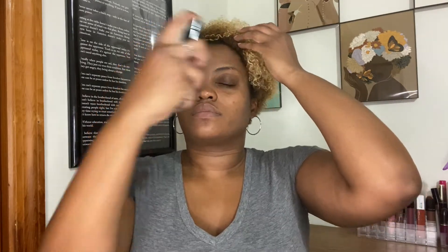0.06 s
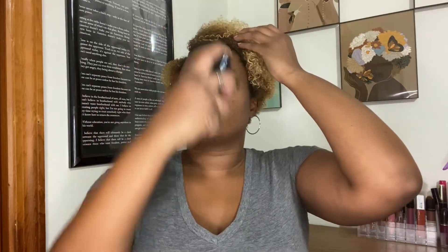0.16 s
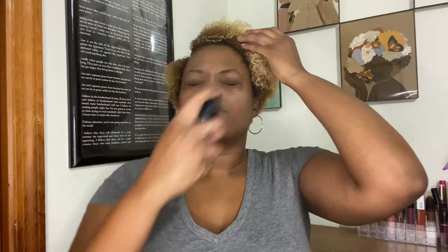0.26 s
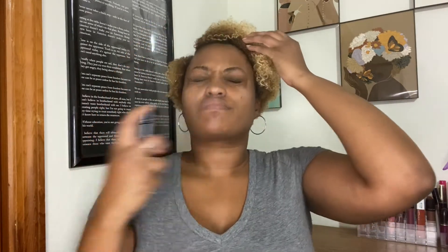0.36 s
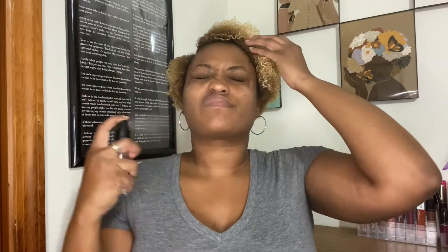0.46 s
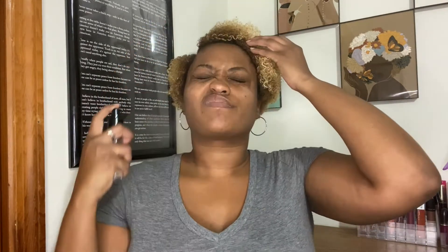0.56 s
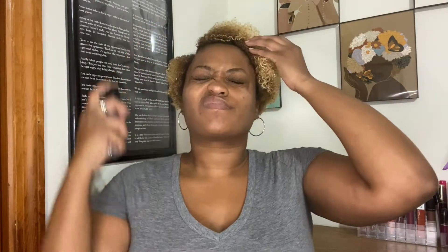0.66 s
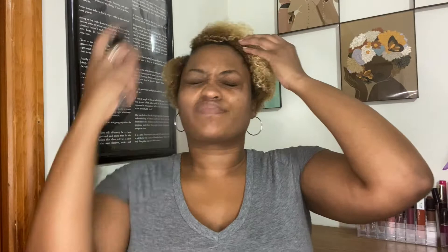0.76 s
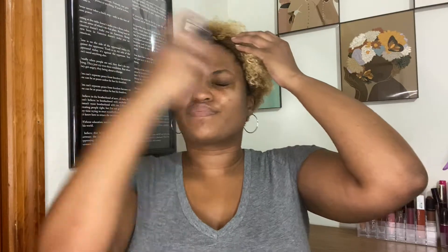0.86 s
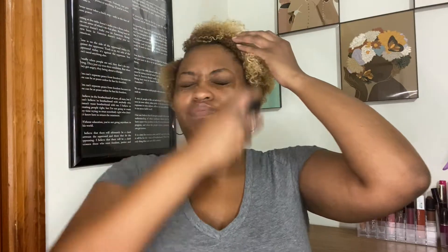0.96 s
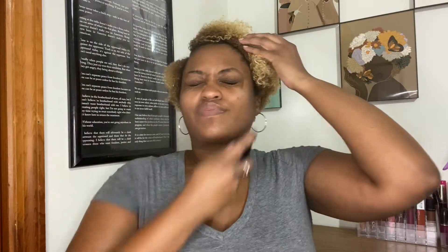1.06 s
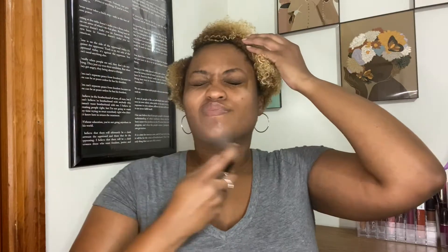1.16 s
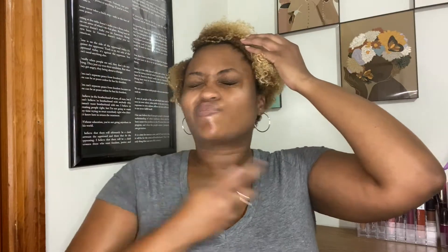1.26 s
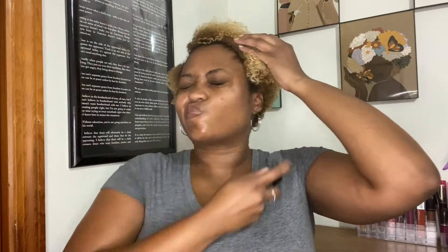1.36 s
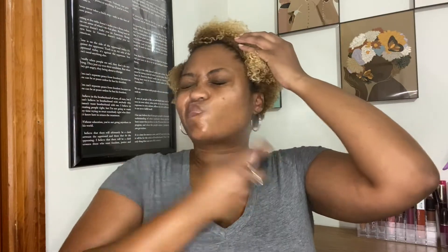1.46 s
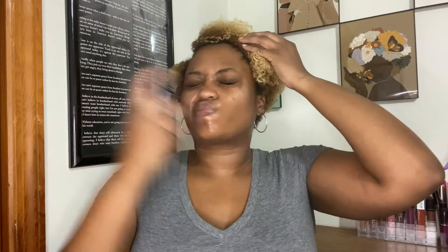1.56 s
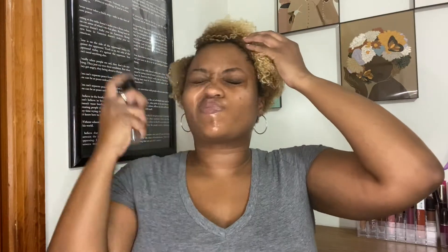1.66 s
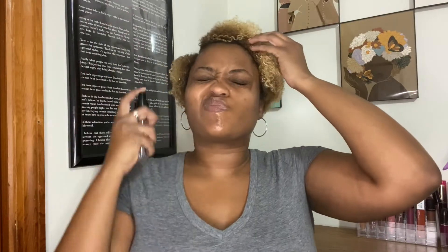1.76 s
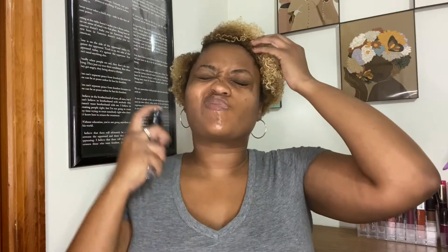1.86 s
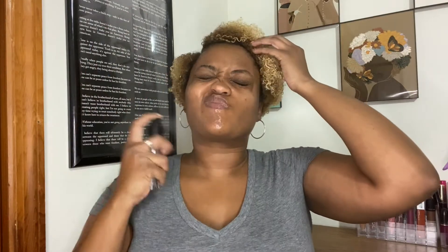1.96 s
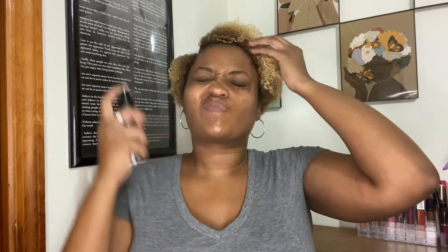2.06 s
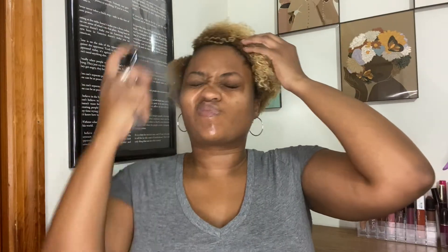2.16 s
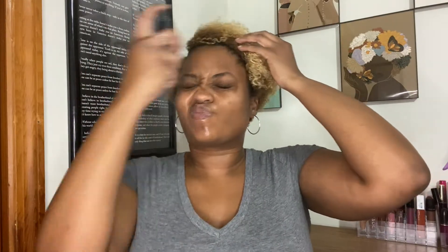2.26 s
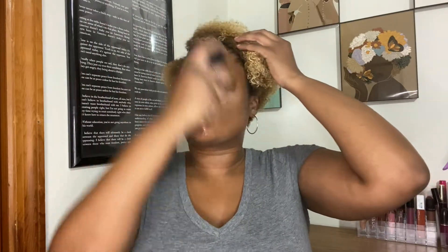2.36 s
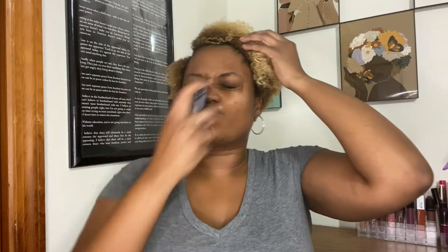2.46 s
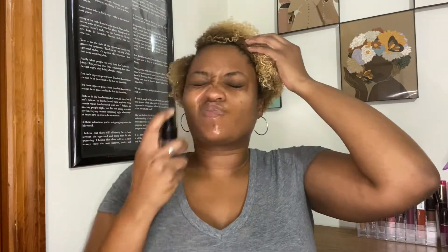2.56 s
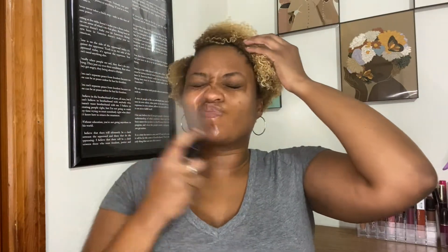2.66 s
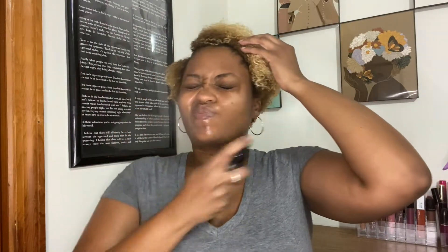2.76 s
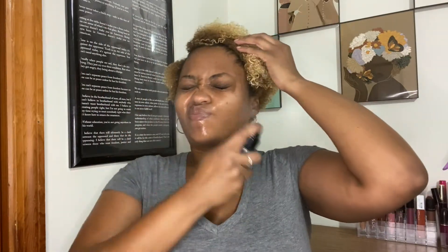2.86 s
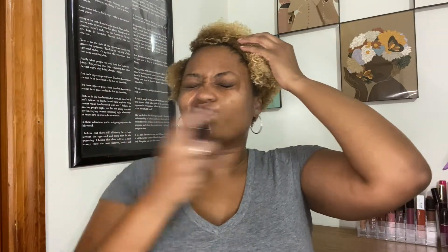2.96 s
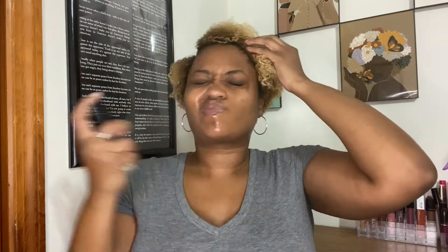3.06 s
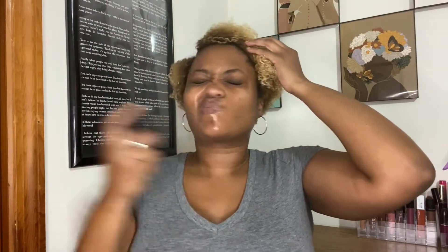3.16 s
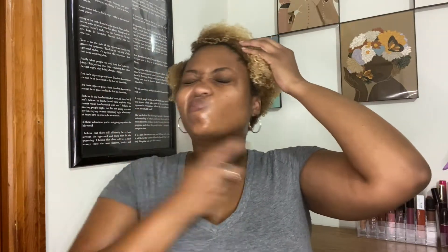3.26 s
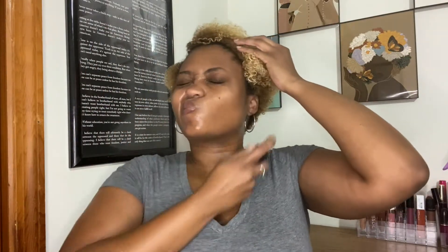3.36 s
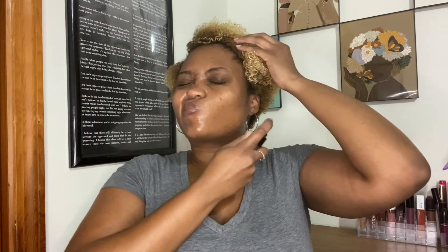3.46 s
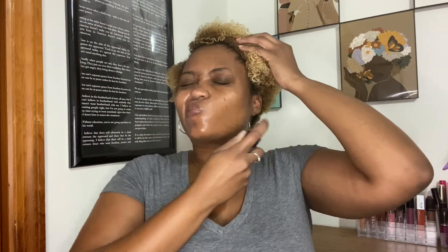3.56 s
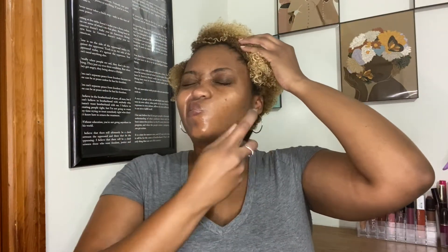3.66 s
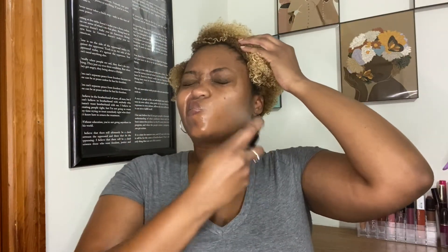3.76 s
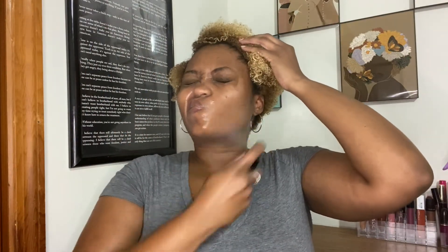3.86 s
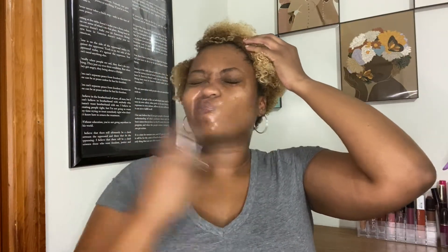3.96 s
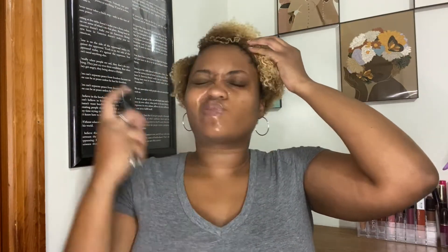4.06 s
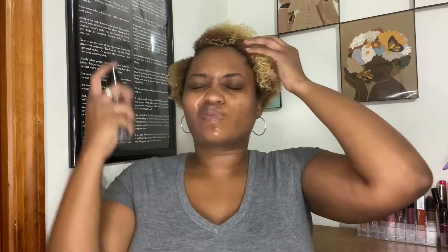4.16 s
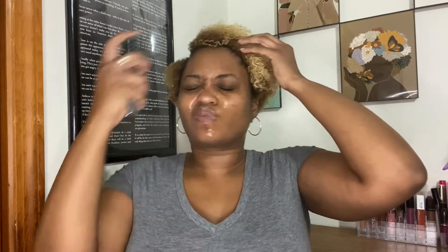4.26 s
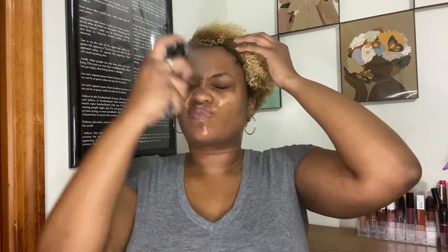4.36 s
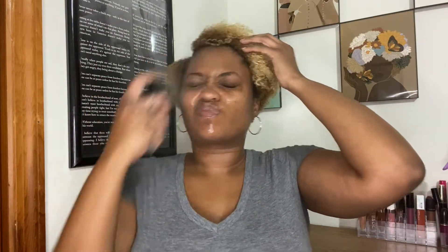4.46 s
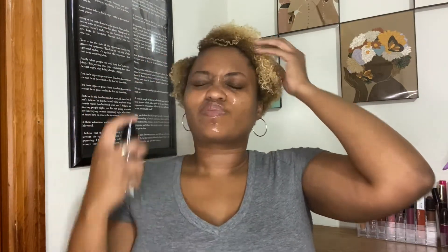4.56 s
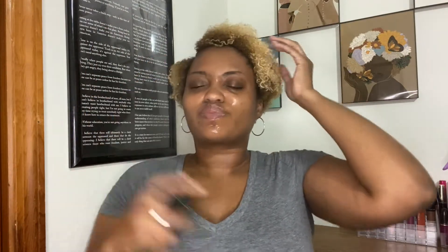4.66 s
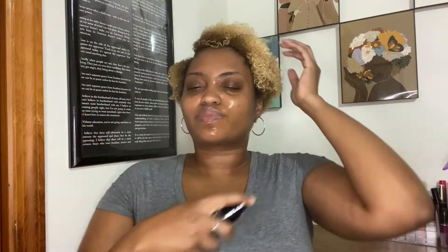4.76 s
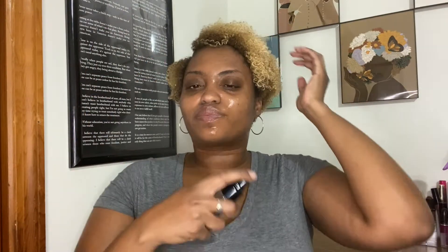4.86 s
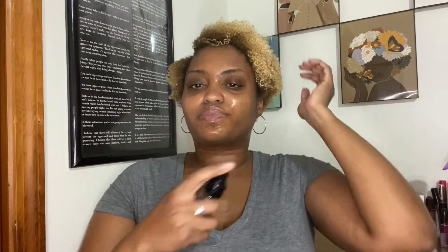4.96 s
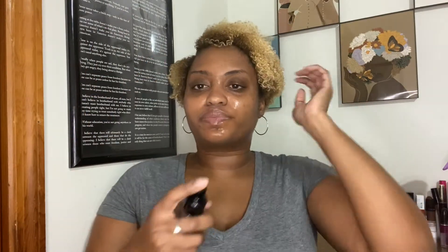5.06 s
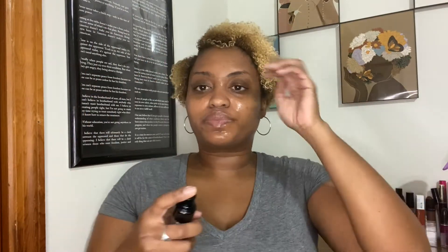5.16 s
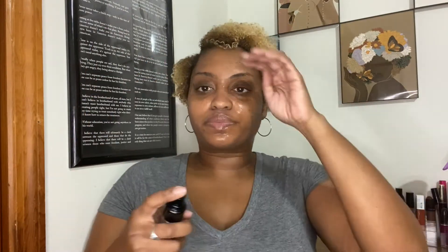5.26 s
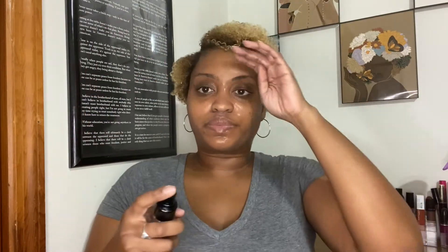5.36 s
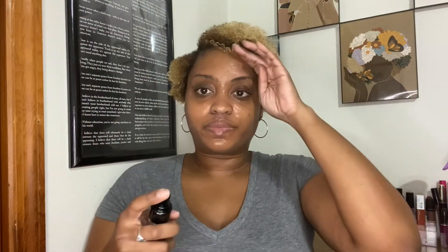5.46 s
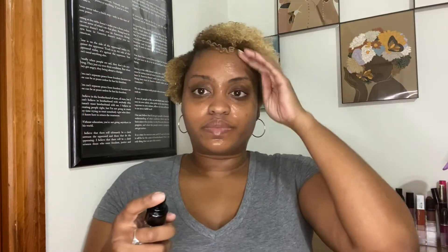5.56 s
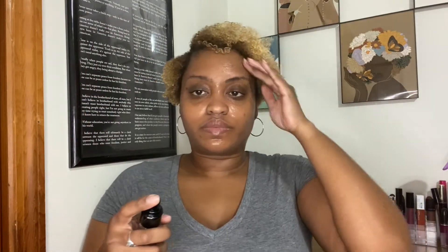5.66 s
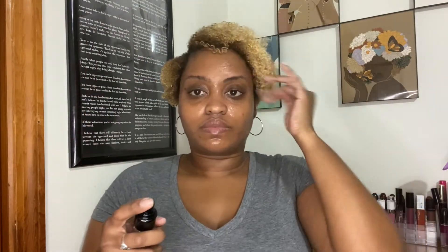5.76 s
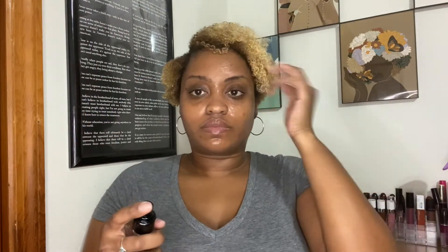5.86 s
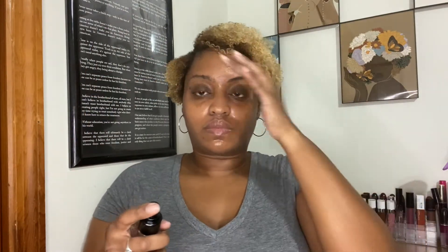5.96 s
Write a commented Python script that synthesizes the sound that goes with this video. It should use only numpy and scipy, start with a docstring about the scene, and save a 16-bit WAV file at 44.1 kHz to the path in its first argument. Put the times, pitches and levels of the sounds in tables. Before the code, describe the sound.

Short, fine spray hisses come in quick succession, mixed with hard clicky pump chatter, then fade into faint low room rumble.

```python
"""A small pump bottle mists a face ten times in a quiet room, swung about between the strokes.
Each stroke is shaped noise, a hiss that follows the push; the valve, plunger and grip click around it.
Six times the pump's spring chatters hard in the same run of five knocks: noise bursts and decaying sines.
Swells of noise are liquid and sleeve; rumble, a faint hum and two soft bumps lie underneath.
A close pair of microphone ports picks it all up."""
import sys
import numpy as np
from scipy import signal
from scipy.fft import rfft, irfft
from scipy.io import wavfile

SR = 44100
rng = np.random.default_rng(int(sys.argv[2]) if len(sys.argv) > 2 else 0)


def materialize(psi):
    """Save the field psi as 16-bit PCM at rate SR to the path in sys.argv[1].

    A 1-D psi becomes a single channel; in a 2-D psi each row is a channel.
    """
    bounded = np.clip(np.atleast_2d(psi).T, -1, 1)
    quanta = np.round(bounded * 32767).astype(np.int16)
    wavfile.write(sys.argv[1], SR, quanta)


N = 264996
TIME = np.arange(N) / SR


def from_db(db):
    """Decibels to gain."""
    return 10 ** (np.asarray(db) / 20)


def rms_one(x):
    """Scale to unit power."""
    return x / np.sqrt(np.mean(x ** 2) + 1e-20)


def at_hz(points, hz):
    """Read a table on a log-frequency axis."""
    f, value = np.transpose(points)
    return np.interp(np.log(hz + 1e-3), np.log(f), value)


def noise(spectrum):
    """Two unrelated noises of one colour, rms 1 over the pair."""
    colour = from_db(at_hz(spectrum, np.fft.rfftfreq(N, 1 / SR)))
    white = rng.standard_normal((2, N))
    return rms_one(irfft(rfft(white) * colour, N))


def drift(rate):
    """Slow random wander, rms 1, through `rate` random points per second."""
    return rms_one(np.interp(TIME * rate, np.arange(N), rng.standard_normal(N)))


def lowpass(x, hz):
    """Keep the part below hz without shifting its phase."""
    return signal.sosfiltfilt(signal.butter(2, hz, fs=SR, output="sos"), x)


def swell(middle, half_length):
    """A smooth rise and fall of height 1."""
    return np.exp(-np.minimum(((TIME - middle) / half_length) ** 2, 20))


# Colour of the room's background. Each row: frequency in Hz, relative density in dB per Hz.
RUMBLE_COLOUR = [(20, -24), (35, -13.5), (58, 1.5), (85, -5), (110, -11.5), (150, -16.5), (250, -25),
                 (500, -35), (1000, -40), (3000, -49.5), (8000, -53.5), (15000, -56.5)]


def rumble(level_db, waver_db):
    """The room's low background, its bass rising and sinking in irregular lumps."""
    floor = noise(RUMBLE_COLOUR)
    bass = lowpass(floor, 350)
    return from_db(level_db) * (floor - bass + bass * from_db(waver_db * drift(10)))


# Steady hum tones. Each row: frequency in Hz, level in dB before the lean to the right.
HUM_TONES = [(59, -61.5), (107, -65.5)]
# Soft hollow bumps. Each row: middle in seconds, half length in seconds, pitch in Hz,
# level in dB before the lean to the right.
SOFT_BUMPS = [(1.588, .04, 163.7, -50), (1.832, 0.014, 175, -45)]


def low_tones(waver, lean_db):
    """Hum sines whose phase wavers by some radians, and two swelling sine bumps, stronger on the right."""
    wander = [waver * drift(10) for _ in HUM_TONES]
    hum = sum(from_db(db) * np.sin(2 * np.pi * hz * TIME + phase)
              for (hz, db), phase in zip(HUM_TONES, wander))
    bumps = sum(from_db(db) * swell(s, half) * np.sin(2 * np.pi * hz * TIME)
                for s, half, hz, db in SOFT_BUMPS)
    return (hum + bumps) * from_db([[-lean_db], [lean_db]])


# Pump strokes. Each row: valve opening in seconds, hold in seconds, peak in dB, opening flow in dB re peak,
# lower hiss in dB re the peak as the aim changes, click of the valve in dB; levels before trims.
PUMP_STROKES = [(0.099, 0.18, -45.5, -9, 2.5, -54), (0.396, 0.11, -47.5, 0.5, 3.5, -44.5),
                (0.626, 0.1, -42, -7, -0.5, -60), (1.106, 0.12, -43, -5, 1, -44.5),
                (1.333, 0.14, -43.5, -7, 1.5, -36.5), (1.852, 0.12, -43, -3, 0.5, -50.5),
                (2.051, 0.15, -42.5, -6, -2, -37.5), (2.571, 0.14, -43.5, -2, -1.5, -41.5),
                (3.743, .19, -42.5, -5.5, -0.5, -55.5), (4.278, 0.19, -42, -4.5, -2, -60)]
# Colour of the nozzle hiss. Each row: frequency in Hz, relative density in dB per Hz.
MIST_COLOUR = [(200, -40), (500, -27), (1000, -11.5), (2000, -5.5), (3000, -2.5), (4300, 0), (6500, 2),
               (9000, 2), (11500, -1), (13300, 5), (15600, -14)]
PUSH_SHARE, EASED_DB = 0.66, -5   # share of the hold where the finger pushes hardest; flow when it eases


def mist(open_s, close_s, split_hz, low_share, sputter_db, flutter_db):
    """The nozzle jet: a harder push lifts the fine hiss more than its lower part; droplets make it sputter."""
    jet = noise(MIST_COLOUR)
    low = lowpass(jet, split_hz)
    low_gain, high_gain = np.zeros(N), np.zeros(N)
    for opens, held, peak_db, opening_db, lower_db, _ in PUMP_STROKES:
        hardest, eases = opens + PUSH_SHARE * held, opens + held
        opening = np.clip((TIME - opens) / open_s, 0, 1)
        closing = np.exp(-np.minimum(np.maximum(TIME - eases, 0) / close_s, 20))
        valve = opening * closing
        push_db = np.interp(TIME, [opens, hardest, eases], [opening_db, 0, EASED_DB])
        high_gain += valve * from_db(peak_db + push_db)
        low_gain += valve * from_db(peak_db + lower_db + low_share * push_db)
    lower_hiss = low * low_gain * from_db(flutter_db * drift(40))
    fine_hiss = (jet - low) * high_gain
    return (lower_hiss + fine_hiss) * from_db(sputter_db * drift(600))


def off_face(x, gain, lag_s, sway):
    """The face throws the hiss back after a short, changing delay, so that its colour shifts."""
    lag = lag_s * np.exp(sway * drift(5))
    echo = np.array([np.interp(TIME - lag, TIME, side) for side in x])
    return (x + gain * echo) / np.sqrt(1 + gain ** 2)


# Light clicks of the plunger and grip. Each row: start in seconds, crack in dB, body in dB,
# ring in Hz; levels before trims.
PLUNGER_CLICKS = [(0.3171, -58.5, -50.5, 3300), (0.547, -54, -56, 3240), (0.5993, -58.5, -62, 4200),
                  (0.7842, -67, -58, 2270), (1.001, -61, -53.5, 3060), (1.0151, -45, -45.5, 2810),
                  (1.0235, -38.5, -43, 2600), (1.2826, -38.5, -44.5, 3600), (1.522, -57, -57, 4060),
                  (1.7619, -35.5, -45.5, 3400), (2.034, -56, -57, 3250), (2.0596, -33, -43.5, 2850),
                  (2.2587, -46, -52, 3590), (2.4973, -41.5, -48, 3600), (2.5438, -41.5, -48, 3730),
                  (2.7706, -40, -43.5, 2960), (3.0279, -39, -47.5, 3800), (3.2502, -59, -70, 2050),
                  (3.373, -43.5, -43.5, 4170), (3.3826, -38, -45, 3700), (4.0492, -63, -58, 4250),
                  (4.0658, -65, -58, 3860), (4.5863, -50, -61.5, 2990), (4.6045, -40, -48, 3700)]
VALVE_BODY_DB, VALVE_HZ = -7, 3200   # body of the valve's click re its crack, and its ring
SEAT_S, SEAT_CRACK_DB, TICK_BODY_DB = 0.004, -7, -2   # gap to the seating; its duller crack; tick's body
CLICK_RING_T60_S = 0.014


def plunger_contacts():
    """The valve clicks as each stroke begins, plunger and grip in between; each click ticks, then seats."""
    valve = [(opens, db, db + VALVE_BODY_DB, VALVE_HZ) for opens, *_, db in PUMP_STROKES]
    rows = []
    for s, crack_db, body_db, hz in PLUNGER_CLICKS + valve:
        rows.append((s, crack_db, body_db + TICK_BODY_DB, hz, CLICK_RING_T60_S))
        rows.append((s + SEAT_S, crack_db + SEAT_CRACK_DB, body_db, hz, CLICK_RING_T60_S))
    return rows


# Modes of the bottle's wall. Each row: nominal pitch in Hz, relative level in dB, t60 in seconds.
BOTTLE_MODES = [(840, -16, 0.008), (1270, -18, 0.0074), (1817, -28.5, 0.0078), (1960, -19.5, 0.045),
                (2760, -12, 0.016), (2831, -4.5, 0.032), (3570, -22, .02), (4906, -6, 0.024),
                (6580, -18, 0.073)]
# Colours of the bright crack and the dull knock. Each row: frequency in Hz, relative density in dB per Hz.
CRACK_COLOUR = [(1000, -22.5), (3000, -11), (5000, -3), (6800, 1.5), (8500, 1), (11000, -1), (13000, 1.5),
                (15600, -5)]
KNOCK_COLOUR = [(100, -6.5), (300, -35), (600, -16.5), (1200, -4), (2400, -0.5), (4000, 0.5), (7000, -9.5),
                (15000, -29.5)]


def knocks(contacts, crack_db, knock_db, ring_db, modes_db, crack_s, knock_s, rise_s, grit_db, snap, snap_s):
    """Each contact snaps, cracks and knocks; it rings the wall and a cavity tuned by the liquid."""
    t = TIME[:SR // 10]
    rise = 1 - np.exp(-t / rise_s)
    crack = rise * (np.exp(-(t / crack_s) ** 2) + snap * np.exp(-t / snap_s))
    knock = rise * np.exp(-(t / knock_s) ** 2)
    sharp, dull, rings = np.zeros(N), np.zeros(N), np.zeros((2, N))
    for s, level_db, body_db, ring_hz, ring_s in contacts:
        first = round(s * SR)
        span = slice(first, first + len(t))
        sharp[span] += from_db(level_db + crack_db) * crack
        dull[span] += from_db(body_db + knock_db) * knock
        # the grip detunes the wall a little from blow to blow
        wall = [(hz * rng.normal(1, 0.024), db + modes_db, t60) for hz, db, t60 in BOTTLE_MODES]
        cavity = (ring_hz, ring_db, ring_s)
        for hz, db, t60 in [cavity] + wall:
            phase = rng.uniform(0, 2 * np.pi, (2, 1))   # its own on each side
            decay = from_db(body_db + db - 60 * t / t60)
            rings[:, span] += rise * decay * np.sin(2 * np.pi * hz * t + phase)
    gritty_crack = sharp * noise(CRACK_COLOUR) * from_db(grit_db * drift(4000))
    return gritty_crack + dull * noise(KNOCK_COLOUR) + rings


# Liquid and sleeve as the arms move. Each row: middle in seconds, half length in seconds,
# level in dB before the lumps.
ARM_SWISHES = [(.358, 0.052, -63), (1.544, 0.017, -61.5), (2.496, 0.039, -61), (3.348, 0.037, -65.5),
               (3.65, .09, -84.5), (4.099, 0.032, -76.5), (4.23, 0.067, -76.5), (4.586, 0.055, -64),
               (5.05, 0.14, -86), (5.717, 0.058, -90.5)]
# Colour of the swishes. Each row: frequency in Hz, relative density in dB per Hz.
SWISH_COLOUR = [(200, -16.5), (700, -8.5), (1700, 2.5), (3500, -4), (7000, -11), (15000, -19.5)]


def swishes(lumpy_db):
    """Soft, uneven swells of rubbing or running noise."""
    level = sum(from_db(db) * swell(s, half) for s, half, db in ARM_SWISHES)
    return level * from_db(lumpy_db * drift(80)) * noise(SWISH_COLOUR)


# Chatters of the pump's spring. Each row: start in seconds, length in seconds, crack in dB, body in dB,
# ring at the start in Hz, ring at the end in Hz, ring t60 in seconds; levels and pitches are nominal.
SPRING_CHATTERS = [(.3851, .0225, -32, -34, 3200, 3000, .015),
                   (.8331, .0445, -25.5, -32.5, 2900, 2400, .018),
                   (1.5812, .0512, -26.5, -29.5, 2800, 2200, .018),
                   (2.3041, .0512, -28, -31, 2550, 3300, .016), (2.8135, .051, -26, -29, 3000, 3250, .03),
                   (3.0855, .0515, -26, -29.5, 2700, 2400, .022)]
# The course of every chatter, five hard knocks. Each row: share of its length, level in dB re the run.
CHATTER_COURSE = [(0, -7), (.218, -1.5), (.483, -1.5), (.772, 0), (1, -7.5)]
TOUCH_LEAD_S = 0.0048   # a duller touch comes just ahead of each middle knock
TOUCH_CRACK_DB, TOUCH_BODY_DB = -14.5, -7.5
RING_SCATTER = 0.055   # the liquid shifts the ring by about this share from knock to knock


def spring_contacts():
    """The spring's chatter swells and stops while its ring glides: rows laid out as for knocks()."""
    rows = []
    last = len(CHATTER_COURSE) - 1
    for start, length, crack_db, body_db, first_hz, last_hz, t60 in SPRING_CHATTERS:
        for k, (share, db) in enumerate(CHATTER_COURSE):
            s = start + share * length
            glide_hz = first_hz + share * (last_hz - first_hz)
            hz, touch_hz = glide_hz * rng.normal(1, RING_SCATTER, size=2)
            crack, body = crack_db + db, body_db + db
            rows.append((s, crack, body, hz, t60))
            if 0 < k < last:
                rows.append((s - TOUCH_LEAD_S, crack + TOUCH_CRACK_DB, body + TOUCH_BODY_DB, touch_hz, t60))
    return rows


def with_bounces(contacts, gap_s, bounce_db):
    """Each contact is followed by a lighter touch after an uneven gap."""
    gaps = gap_s * rng.uniform(0.71, 1.6, len(contacts))
    bounces = [(s + gap, crack + bounce_db, body + bounce_db, *ring)
               for gap, (s, crack, body, *ring) in zip(gaps, contacts)]
    return list(contacts) + bounces


# How long the room's tail lasts before shaping. Each row: frequency in Hz, t60 in seconds.
ROOM_DECAY = [(200, 0.41), (1000, 0.16), (3000, 0.22), (8000, 0.19), (15000, 0.13)]
SWING_HZ = 1.192   # how often the arm carries the bottle back and forth


def room(x, wet_db, early, early_s, count=3):
    """Direct sound plus a tail: a rush off nearby surfaces, band-wise decay, changing as the bottle moves."""
    t, edges, out = TIME[:SR // 2], np.geomspace(100, 18000, num=9), x
    shape = (1 - np.exp(-(t / 0.0023) ** 2)) * (1 + early * np.exp(-t / early_s))
    for place in range(count):
        tail = 0
        for low, high in zip(edges, edges[1:]):
            band_filter = signal.butter(2, [low, high], "band", fs=SR, output="sos")
            band = signal.sosfilt(band_filter, rng.standard_normal((2, len(t))))
            tail = tail + band * from_db(-60 * t / at_hz(ROOM_DECAY, np.sqrt(low * high)))
        tail = rms_one(tail * shape) / np.sqrt(len(t))
        # each place on the swing has its own tail; together they keep the power constant
        nearness = np.sqrt((1 + np.cos(2 * np.pi * (SWING_HZ * TIME + place / count))) / count)
        out = out + from_db(wet_db) * signal.oaconvolve(x * nearness, tail, axes=1)[:, :N]
    return out


# How alike the two ports hear the bottle and the rumble.
# Each row: frequency in Hz, likeness from 0 to 1 (anything above counts as 1).
BOTTLE_LIKENESS = [(60, 3), (200, 0), (600, 0.73), (1500, 0.61), (3000, 0.2), (5000, 0.29), (6500, 0.4),
                   (8000, 0.83), (9200, 0.27), (10100, 12.8), (11000, 11.9), (11800, 0.25), (13000, 1.1)]
FLOOR_LIKENESS = [(60, 0.73), (200, 0.61), (450, 0.074), (5000, .15), (8000, 0.85), (10500, 1), (14000, .9)]
# Phase between the ports. Each row: frequency in Hz, lead of the left in radians.
LEFT_LEAD = [(20, 0), (1800, 0), (3200, -2.3), (4400, -1.5), (5400, -3), (8000, 0), (10500, np.pi),
             (12900, 2 * np.pi), (15300, 3 * np.pi), (17000, 11)]
# Level between the ports. Each row: frequency in Hz, left minus right in dB.
PORT_BALANCE = [(60, -4.5), (400, -5), (1000, -1), (4000, 0.35), (6500, -1.5), (8000, -0.5)]


def ports(pair, likeness):
    """The right port shares part of the left one's sound, shifted in phase; the bass leans right."""
    hz = np.fft.rfftfreq(N, 1 / SR)
    left, other = rfft(pair)
    alike = np.clip(at_hz(likeness, hz), 0, 1)
    shift = np.exp(-1j * np.interp(hz, *np.transpose(LEFT_LEAD)))
    right = (alike * left + np.sqrt(1 - alike ** 2) * other) * shift
    lean = from_db(at_hz(PORT_BALANCE, hz) / 2)
    return irfft(np.array([left * lean, right / lean]), N)


def scene():
    """Mist, clicks, swishes and spring chatter in the room, over its rumble, hum and bumps."""
    jet = from_db(-0.18) * mist(open_s=0.008, close_s=0.0084, split_hz=2800, low_share=0.51,
                                sputter_db=1.0, flutter_db=2.0)
    spray = off_face(jet, gain=0.36, lag_s=0.0004, sway=0.42)
    clicks = knocks(plunger_contacts(), crack_db=0.5, knock_db=1.5, ring_db=5.5, modes_db=1.5,
                    crack_s=0.0027, knock_s=0.0035, rise_s=0.0007, grit_db=3.5, snap=0.7, snap_s=0.0006)
    handling = swishes(lumpy_db=3.0)
    contacts = with_bounces(spring_contacts(), gap_s=0.0013, bounce_db=-12.5)
    chatter = knocks(contacts, crack_db=0.8, knock_db=3.8, ring_db=3.5, modes_db=-1,
                     crack_s=0.0018, knock_s=0.002, rise_s=0.00026, grit_db=3.5, snap=1.4, snap_s=0.0005)
    soft_in_room = room(spray + handling, wet_db=-4.5, early=0.25, early_s=0.0082)
    hard_in_room = room(chatter + clicks, wet_db=-4.5, early=0.44, early_s=0.0097)
    bottle = ports(soft_in_room + hard_in_room, BOTTLE_LIKENESS)
    background = ports(rumble(level_db=-58.5, waver_db=2.4), FLOOR_LIKENESS)
    return bottle + background + low_tones(waver=0.84, lean_db=2.7)


def record(dry):
    """The top is cut steeply above 15.9 kHz."""
    return signal.sosfilt(signal.ellip(10, 0.1, 80, 15900, fs=SR, output="sos"), dry)


dry = scene()
out = record(dry)
materialize(out)
```